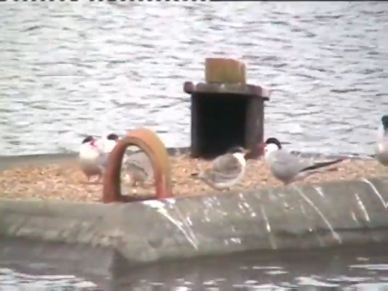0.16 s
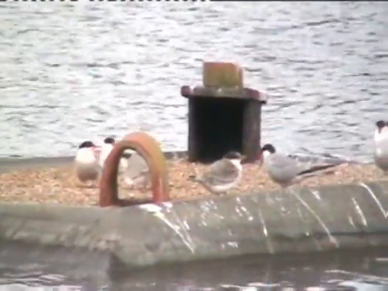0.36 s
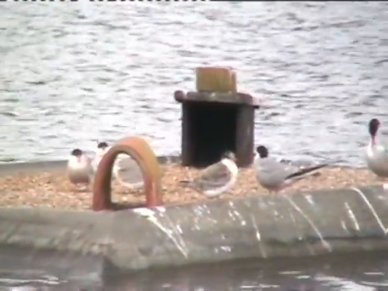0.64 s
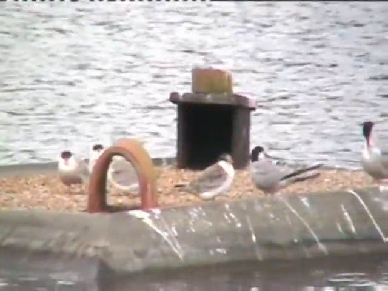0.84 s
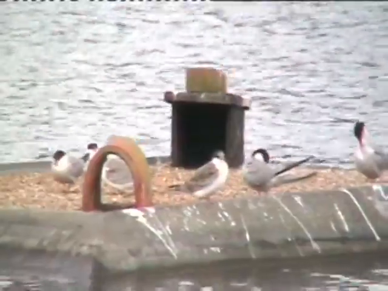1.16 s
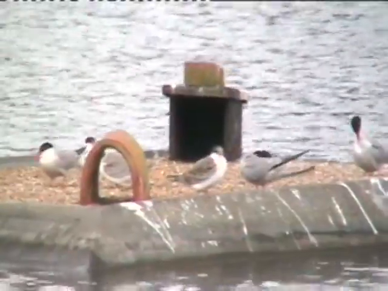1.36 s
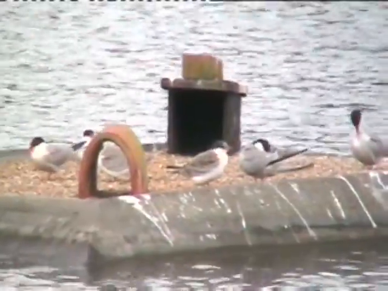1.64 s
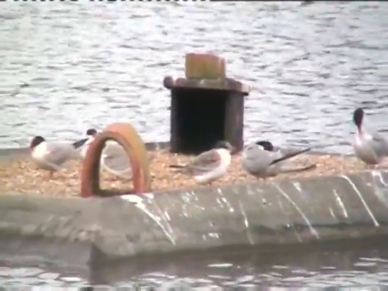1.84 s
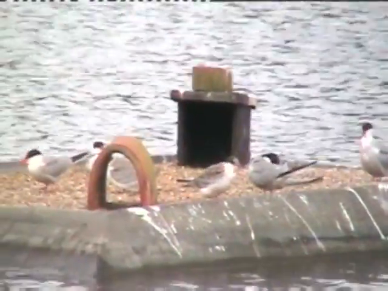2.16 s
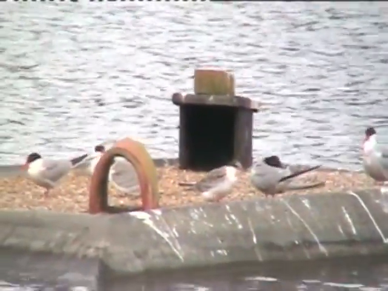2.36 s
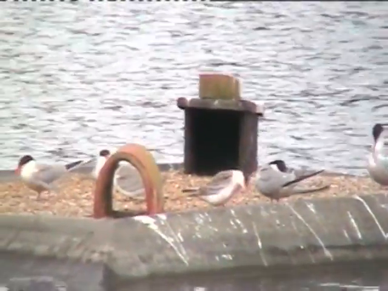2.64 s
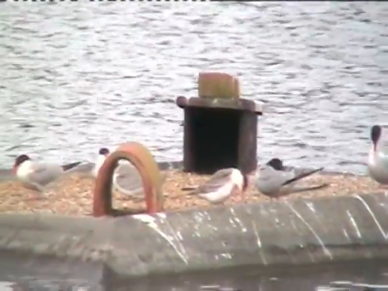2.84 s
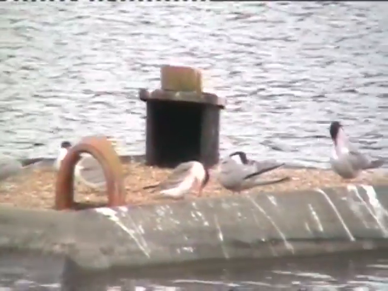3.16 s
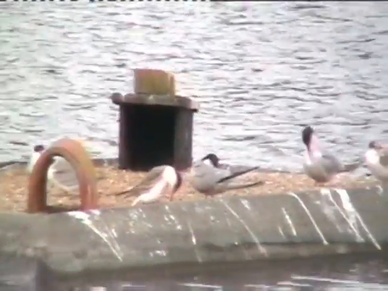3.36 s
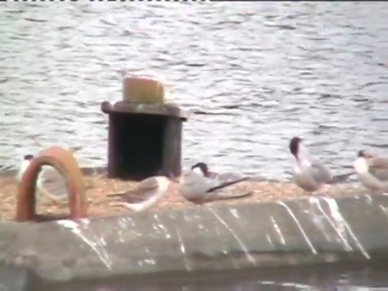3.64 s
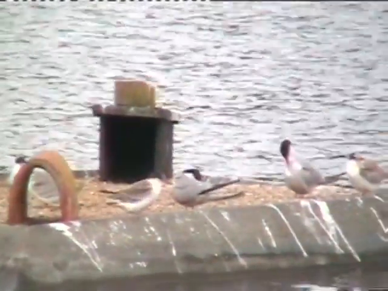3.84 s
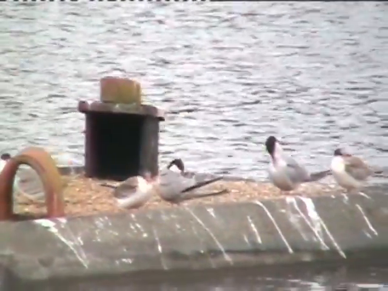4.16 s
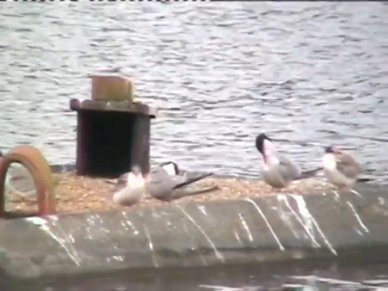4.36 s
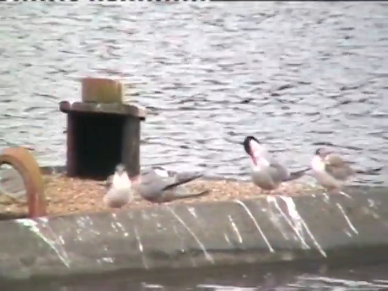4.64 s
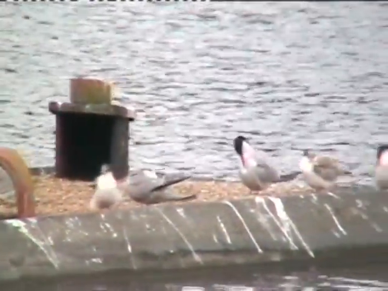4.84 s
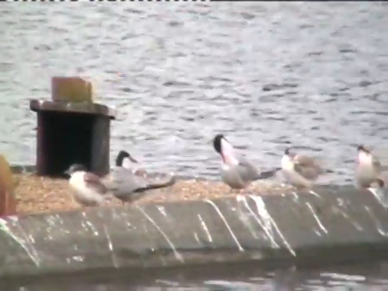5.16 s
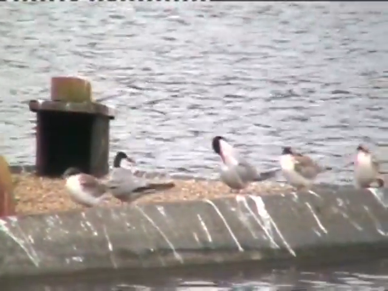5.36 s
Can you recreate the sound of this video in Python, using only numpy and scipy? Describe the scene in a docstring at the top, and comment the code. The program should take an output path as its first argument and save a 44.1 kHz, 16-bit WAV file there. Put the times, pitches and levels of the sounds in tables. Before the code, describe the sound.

Terns chatter in quick clipped notes, then give harsh pulsed calls and two trilled falling cries over a murmuring colony and steady wind hiss.

```python
"""A near tern chatters in clipped notes, each a harmonic stack that snaps on and breaks off in a puff of breath.
Around it on a gravel raft in a lake: two trilled falling cries, long pulsed calls, thin peeps, hoarse rasps.
The far colony murmurs as overlapping blurred notes; wind and water are shaped noise.
A camera with two close microphone ports adds the whine and buzz of its own drive: thin lines and locked harmonics."""
import sys
import numpy as np
from scipy import signal
from scipy.fft import rfft, irfft, next_fast_len
from scipy.io import wavfile
from scipy.ndimage import uniform_filter1d

SR = 44100
rng = np.random.default_rng(int(sys.argv[2]) if len(sys.argv) > 2 else 0)


def store_wav(level_fs):
    """Save 16-bit WAV to argv[1]."""
    pcm = np.round(np.clip(np.atleast_2d(level_fs), -1, 1) * 32767)
    wavfile.write(sys.argv[1], SR, pcm.T.astype(np.int16))


def elevation(decibels):
    """Turn decibel levels (scalar or array-like) into linear amplitude ratios."""
    levels = np.asarray(decibels, float)
    return 10 ** (levels / 20)


N = 242991

# microphone ports: (frequency [Hz], likeness of wind in both [0-1], left leads [rad], left minus right [dB])
PORTS = [(40, 0.3, 0.5, -4.5), (129, 0.8, 3, -2), (260, 0.4, 2.5, -1.5), (516, 0.44, 1.05, -2),
         (950, 0.61, 0, -0.5), (2000, 0.52, 0.08, -1.1), (4000, 0.7, -1.03, -2), (6360, 0.98, -1.76, -4),
         (7500, 0.8, -2, 0)]
TRILL_S, TRILL_LEAD_S = 0.0303, 0.0065  # spacing of the catches; how far their grid precedes the voice break


def evened(x):
    """Scales to rms 1."""
    return x / np.sqrt(np.mean(x ** 2) + 1e-20)


def read(points, hz, axis=1):
    """Reads one column of a table over log frequency."""
    table = np.transpose(points)
    return np.interp(np.log(hz + 1), np.log(table[0] + 1), table[axis])


def add(mix, s, sound):
    """Adds a sound at s seconds, cut at the end of the mix."""
    part = mix[round(s * SR):][:len(sound)]
    part += sound[:len(part)]


def band_noise(count, width_hz):
    """Complex noise that wanders at about width_hz, power 1."""
    r = np.exp(-np.pi * width_hz / SR)
    white = rng.standard_normal((count + 2000, 2)) @ [1, 1j]
    z = signal.lfilter([1], [1, -2 * r, r * r], white)[2000:]
    return z / np.sqrt(np.mean(abs(z) ** 2))


def syrinx(hz, harmonics_db, rough, smear_hz=130):
    """A harmonic stack; roughness trades each steady line for a fuzzy one, wider on higher harmonics."""
    phase = 2 * np.pi * np.cumsum(hz) / SR
    rough = np.clip(rough, 0, 1)
    out = 0
    for k, db in enumerate(harmonics_db, 1):
        fuzz = np.sqrt(1 - rough) + np.sqrt(rough) * band_noise(len(hz), k * smear_hz)
        out = out + elevation(db) * np.sqrt(2) * (np.exp(1j * k * phase) * fuzz).real
    return out


def port_pair(hz, likeness):
    """Left and right factors, scaled so that their mean nearly keeps the power of the source."""
    half = elevation(read(PORTS, hz, axis=3) / 2) * np.exp(0.5j * read(PORTS, hz, axis=2))
    mean_power = (abs(half) ** 2 + abs(half) ** -2 + 2 * likeness * np.cos(2 * np.angle(half))) / 4
    return np.array([half, 1 / half]) / np.sqrt(mean_power + 0.037)


def whine():
    """Thin lines that waver in strength and phase and beat with a slowly turning part of the drive."""
    # tones of the camera drive: (frequency [Hz], level [dB])
    hum_lines = [(207, -72), (1334, -71), (2223, -69), (3113, -69), (4447, -71)]
    whine_lines = [(4891, -70), (5215, -66.5), (5336, -62), (5356, -63.5), (5780, -70), (5803, -64),
                   (5986, -67.5), (6385, -70.5)]
    t, out = np.arange(N) / SR, np.zeros(N)
    for hz, db in hum_lines + whine_lines:
        coarse_t = t[::256]
        waver = np.interp(t, coarse_t, band_noise(len(coarse_t), 900).real)  # at about 900 / 256 Hz
        beat = 1 + 0.29 * np.cos(2 * np.pi * (8.5 * t + rng.random()))
        line = np.sin(2 * np.pi * (hz * t + rng.random()) + 0.72 * waver)
        out += elevation(db) * evened(elevation(0.92 * waver) * beat * line)
    return out


def buzz():
    """Motor ticks ringing in the camera body: harmonics locked in step, so the treble throbs at the tick rate."""
    tick_hz = 298.16
    # a second rotation repeats the harmonics shifted upward: (shift [Hz] of each set)
    shifts_hz = [0, 93.5, 102.5, 196, 204.3]
    # strength of the sets: (level [dB] of each set)
    sets_db = [-68.5, -71, -70, -68, -74.5]
    # ring of the camera body: (frequency [Hz], gain [dB])
    body = [(5000, -9), (5300, -0.5), (5600, 0), (5900, -1.5), (6200, -2), (6500, -12), (7100, -20)]
    t, k = np.arange(N) / SR + rng.random(), np.arange(15, 24)  # audible harmonics
    cycle = np.arange(4096) / 4096
    place = (tick_hz * t % 1 * len(cycle)).astype(int)
    out = np.zeros(N)
    for shift_hz, db in zip(shifts_hz, sets_db):
        lines = elevation(db + read(body, k * tick_hz + shift_hz))
        tick = lines @ np.exp(2j * np.pi * np.outer(k, cycle))
        turn = np.exp(2j * np.pi * shift_hz * t)
        out += np.sqrt(2) * (tick[place] * turn).real
    return out


def wind():
    """Smooth hiss of wind and water with faint patches, partly unrelated at the two ports."""
    # hiss spectrum: (frequency [Hz], relative density [dB per Hz])
    hiss_shape = [(40, -26), (130, -25.5), (190, -15.5), (300, -3.5), (630, 1), (1450, -6), (2640, -11.5),
                  (4380, -9.5), (4990, -12), (5450, -8), (6360, -13), (7000, -19.5), (7760, -39),
                  (9000, -71)]
    level_db, patch_db = -48.5, 0.8
    frames, hz = N // 256 + 5, np.fft.rfftfreq(1024, 1 / SR)
    a, b, c, d, patches = rng.standard_normal((frames, 513, 5)).T
    patches = evened(uniform_filter1d(uniform_filter1d(patches, 10, 0), 14, 1))
    same = np.clip(read(PORTS, hz), 0, 1)
    left = a + 1j * b
    right = same[:, None] * left + np.sqrt(1 - same[:, None] ** 2) * (c + 1j * d)
    z = np.array([left, right])
    z *= elevation(read(hiss_shape, hz)[:, None] + patch_db * patches) * port_pair(hz, same)[:, :, None]
    hiss = signal.istft(z, nperseg=1024, noverlap=768)[1][:, :N]
    return elevation(level_db) * hiss / hiss.mean(0).std()


def far_colony():
    """Many overlapping distant calls, blurred to hoarse notes that crowd in a few bands."""
    # swell of the whole colony: (time [s], level [dB])
    colony_db = [(0, -56), (.7, -55), (.8, -70.5), (.9, -54), (1.65, -55.5), (1.75, -64.5), (1.9, -53.5),
                 (2.38, -53.5), (2.44, -72.5), (2.67, -68), (2.72, -48), (3.02, -52.5), (3.09, -61),
                 (3.5, -49.5), (4.0, -59.5), (4.15, -54), (5.5, -50)]
    # where its calls crowd: (centre [Hz], half width [Hz], level [dB])
    bands = [(1800, 300, 1), (3284, 300, -5), (4320, 300, 2)]
    mix, u = np.zeros(N), np.linspace(0, 1, 6000)
    for when, band, spread, size in rng.random((600, 4)):
        hz, width_hz, db = bands[int(band * len(bands))]
        pitch_hz = hz + width_hz * (2 * spread - 1 + 0.297 * (0.5 - u))
        note = syrinx(pitch_hz, [db - 3 * size], 1.0, smear_hz=464)
        add(mix, when * N / SR, note * np.sin(np.pi * u))
    return evened(mix) * elevation(np.interp(np.arange(N) / SR, *np.transpose(colony_db)))


def rasp(s, length_s, hz, width_hz, db, pulses_per_s=120):
    """Noise in the throat resonance, gated by uneven pulses."""
    t = np.arange(0, length_s, 1 / SR)
    turns = np.cumsum(pulses_per_s * (1 + 0.25 * band_noise(len(t), 150).real)) / SR
    throat = (band_noise(len(t), width_hz) * np.exp(2j * np.pi * hz * t)).real
    gate = 0.27 + np.exp(-(turns % 1) / 0.3)
    return s, elevation(db) * evened(throat * gate) * signal.windows.tukey(len(t), 0.5)


def peep(s, length_s, start_hz, end_hz, db):
    """One thin line that glides fast, then levels out."""
    u = np.linspace(0, 1, int(length_s * SR))
    hz = end_hz + (start_hz - end_hz) * (1 - u) ** 2.2
    return s, syrinx(hz, [db], 0.06) * signal.windows.tukey(len(u), 0.4)


def long_call(voice, s, length_s, top_hz, end_hz, db):
    """A drawn-out stack that bends at its top, sags and changes level, chopped by a slightly uneven throb."""
    # voices: name: (pulse rate [1/s], pulse depth [0-1], roughness [0-1], climb [share of pitch],
    # place of the top [0-1], level change after the top [dB], harmonics [dB])
    voices = {"open": (44.5, 0.28, 0.25, 0.07, .33, -7, [-11, 0, -11.5, -4.5, -14.5]),
              "soft": (33, 0.4, 0.48, .02, .25, -1, [-10, 0]),
              "clear": (42, 0.33, 0.26, .025, .18, -5.5, [-14, 0, -10.5, -12]),
              "high": (45, .6, 0.36, -0.07, 0.77, -2, [0.5]),
              "hoarse": (87, 0.5, 0.65, .01, .55, -7.5, [-14, 1.5, -7, -12, -10.5]),
              "buzz": (73.3, 0.74, 0.55, .01, .33, -4.5, [-11, -9, -11, -1, -2.5, -10]),
              "stutter": (38.3, 0.9, 0.4, 0.011, .15, 1.5, [-12, -13.5, -9.5, -1.5, -13.5, -10.5]),
              "thin": (37, .05, 0.06, 0.24, .48, -3, [0]),
              "arch": (40, .1, .16, .08, .38, -3, [-14, 0, -11, -11.5])}
    pulses_per_s, depth, rough, climb, top, fade_db, harmonics_db = voices[voice]
    u = np.linspace(0, 1, int(length_s * SR))
    turns = np.cumsum(pulses_per_s * (1 + 0.06 * band_noise(len(u), 30).real)) / SR
    throb = evened(1 + np.clip(depth, 0, 1) * np.cos(2 * np.pi * turns))
    hz = np.interp(u, [0, top, 1], [top_hz * (1 - climb), top_hz, end_hz])
    if climb > 0:  # rounds over its top
        span_hz = np.where(u < top, top_hz * climb, abs(top_hz - end_hz) + 1)
        hz = top_hz - (top_hz - hz) ** 2 / span_hz
    stack = syrinx(hz, harmonics_db, rough, smear_hz=112)
    swell_db = (climb > 0) * -2.5 * np.clip(1 - u / top, 0, 1)  # only a climbing call swells
    level_db = db + swell_db + fade_db * np.clip((u - top) / (1 - top), 0, 1) ** 2
    return s, elevation(level_db) * throb * stack * signal.windows.tukey(len(u), 0.22)


def hoarse_end(break_s):
    """The cry dies in a rasp that the trill keeps chopping."""
    # hoarse end: (time after the break [s], length [s], centre [Hz], width [Hz], level before the chopping [dB])
    ending = (.04, .088, 3000, 1300, -48)
    s, sound = rasp(break_s + ending[0], *ending[1:], pulses_per_s=230)
    t = ending[0] + TRILL_LEAD_S + np.arange(len(sound)) / SR
    return s, sound * (1 - 0.5 * np.cos(2 * np.pi * t / TRILL_S))


def cry(break_s, lead_s, top_hz, db, drop, slide_s):
    """A cry that climbs, trills in evenly spaced catches, falls, and breaks to a lower note."""
    # fall of the cry: (time from the break [s], pitch [share of the top], level [dB])
    fall = [(-.08, 1, -1.3), (-.046, 0.96, 0), (-.018, .9, 2), (-.002, .89, -1), (.002, .755, -0.5),
            (0.037, .722, -5), (.05, .7, -12)]
    # strength of harmonics 1-4: (level [dB] of each)
    cry_harmonics_db = [-1.5, 2, -13, -26]
    start_share, start_db, swell_s, rise_s = 0.84, -5.5, 0.03, 0.03
    trill_fade_s, trill_least, catch_db = 0.075, 0.15, 9.5
    s, share, fall_db = np.transpose(fall)
    t = np.arange(-lead_s, s[-1], 1 / SR)
    hz = top_hz * np.interp(t, [-lead_s, rise_s - lead_s, *s], [start_share, 0.98, *share])
    level_db = db + np.interp(t, [-lead_s, swell_s - lead_s, *s], [start_db, 0, *fall_db])
    for k in (-6, -5, -4, -3, -2, -1, 1):  # the break stands in for catch 0
        catch_s = k * TRILL_S - TRILL_LEAD_S
        grow = np.clip((catch_s + lead_s) / trill_fade_s, 0, 1) ** 0.5
        shrink = np.clip(-catch_s / trill_fade_s, trill_least, 1)
        width_s = np.where(t < catch_s, slide_s, 0.004)
        hz = hz * (1 - drop * shrink * grow * np.exp(-abs((t - catch_s) / width_s) ** 3))
        level_db = level_db - catch_db * np.exp(-((t - catch_s - 0.002) / 0.003) ** 2)
    hz = hz * (1 + 0.008 * band_noise(len(t), 150).real)
    sound = elevation(level_db) * syrinx(hz, cry_harmonics_db, 0.039)
    return break_s - lead_s, sound * signal.windows.tukey(len(t), 0.04)


def chatter(mix):
    """Each note snaps on, slides in pitch and breaks off downward within 25 ms, in a puff of breath."""
    # clipped notes: (time [s], start pitch [Hz], pitch after 18 ms without scoop and break [Hz],
    # level [dB], low harmonics against the rest [dB])
    notes = [(0.004, 1113, 1049, -43.5, -7.5), (0.141, 1120, 1150, -49, -4), (0.166, 1244, 1196, -52, 3.5),
             (0.195, 1176, 1136, -45, -4.5), (0.221, 1077, 1078, -45.5, -10), (0.245, 1090, 990, -49.5, -5),
             (0.389, 1340, 1324, -45.5, -24), (0.425, 1184, 1347, -45, -9), (0.458, 1220, 1138, -44, -7.5),
             (0.485, 1143, 1132, -46.5, -5), (0.516, 1132, 1120, -46, -3), (0.607, 1316, 1392, -44, -13),
             (0.641, 1190, 1227, -45, -15), (0.675, 1094, 1217, -44.5, -26),
             (0.705, 1163, 1080, -46.5, -26), (0.85, 1330, 1540, -48, -24), (0.883, 1323, 1375, -45.5, -29),
             (0.927, 1470, 1402, -49, -20), (0.946, 1446, 1203, -47.5, -25.5),
             (0.978, 1345, 1350, -51, -27.5), (1.0, 1410, 1354, -52.5, -25), (1.018, 1357, 1396, -52, -25),
             (1.1, 1470, 1510, -49.5, -25), (1.167, 1392, 1360, -50, -19), (1.343, 1525, 1497, -51.5, -19),
             (1.366, 1465, 1426, -50, -21), (1.385, 1370, 1365, -50.5, -21),
             (1.402, 1394, 1316, -49.5, -25), (1.574, 1463, 1460, -52, -23), (1.602, 1434, 1326, -51, -12),
             (1.639, 1394, 1374, -51.5, -13)]
    # throat resonance: (frequency [Hz], gain [dB])
    throat_db = [(3300, -5), (3650, 1.5), (4100, -1), (4600, 0), (5000, -12)]
    t = np.arange(0, 0.03, 1 / SR)
    shape = np.clip(t / 0.0018, 0, 1) * np.clip((0.025 - t) / 0.009, 0, 1)
    for s, start_hz, end_hz, db, low_db in notes:
        slide_hz = start_hz + (end_hz - start_hz) * t / 0.018
        scoop = 0.2 * (end_hz > start_hz) * np.exp(-t / 0.003)  # a rising note starts low and leaps to pitch
        hz = slide_hz * (1 - 0.1 * (t / 0.0248) ** 4 - scoop)
        harmonics_db = [low_db - 4, low_db, read(throat_db, 3 * hz), read(throat_db, 4 * hz)]
        puff = syrinx(3900 + 0 * t, [-4], 0.9, smear_hz=1990)
        add(mix, s - 0.001, elevation(db) * shape * (syrinx(hz, harmonics_db, 0.16) + puff))


def scatter_off_raft(birds):
    """Adds a short decaying noise tail, the scatter off water and gravel."""
    t = np.arange(0, 0.25, 1 / SR)
    tail = rng.standard_normal(len(t)) * elevation(-60 * t / 0.44) * (t > 0.003)
    return birds + elevation(-10) * signal.oaconvolve(birds, tail / np.linalg.norm(tail))[:N]


def scene():
    """Birds with their scatter and the camera drive, through the ports, over the wind."""
    # trilled cries: (voice break [s], lead-in before it [s], top pitch [Hz], level [dB],
    # largest pitch drop in a catch [share], slide into it [s])
    cries = [(3.344, .181, 1823, -44.5, .15, .0075), (5.389, .209, 1757, -44, .1, .004)]
    # long pulsed calls: (voice, time [s], length [s], top pitch [Hz], end pitch [Hz], level [dB])
    long_calls = [("open", .02, .29, 1005, 925, -49.5), ("soft", .36, 0.41, 925, 847, -55),
                  ("clear", .965, .3, 1030, 930, -50.5), ("high", 1.055, 0.295, 4650, 4180, -56.5),
                  ("soft", 1.26, 0.28, 935, 865, -58), ("arch", 1.87, .24, 1008, 965, -52),
                  ("soft", 2.1, 0.19, 940, 845, -53), ("soft", 2.31, .11, 950, 930, -53),
                  ("clear", 2.92, .28, 1018, 960, -51), ("arch", 4.105, .235, 1025, 910, -49.5),
                  ("hoarse", 2.715, .2, 940, 910, -49), ("hoarse", 4.81, 0.11, 950, 900, -52.5),
                  ("buzz", 2.71, 0.18, 861, 807, -53), ("stutter", 2.873, .143, 795, 690, -49.5),
                  ("thin", .19, .095, 1430, 1100, -53.5), ("thin", .29, 0.15, 1450, 1190, -55.5),
                  ("stutter", 3.498, .065, 673, 674, -55.5), ("soft", 3.5, 0.078, 900, 880, -56)]
    # thin gliding peeps: (time [s], length [s], start pitch [Hz], end pitch [Hz], level [dB])
    peeps = [(0.16, .02, 1350, 2000, -52), (0.207, .02, 1500, 1940, -50.5), (0.23, 0.022, 1400, 1940, -49),
             (.263, .02, 1440, 1900, -51), (0.282, .045, 1550, 2230, -54), (.322, .026, 1840, 2230, -54),
             (.308, .024, 1300, 1800, -50), (.917, .012, 4300, 3500, -52), (0.995, 0.045, 4300, 3450, -58),
             (1.52, .045, 4550, 4000, -54), (2.272, 0.052, 4100, 3620, -55), (2.382, 0.02, 3760, 3450, -57)]
    # hoarse rasps: (time [s], length [s], centre [Hz], width [Hz], level [dB])
    rasps = [(1.092, .11, 4300, 595, -55), (1.329, .1, 4180, 940, -51), (1.55, 0.14, 4130, 802, -55),
             (1.958, 0.31, 1924, 617, -57), (1.409, .11, 3280, 451, -55), (4.167, 0.22, 4470, 500, -53),
             (4.62, .35, 4410, 371, -56.5), (4.814, 0.12, 3200, 704, -52.5), (2.915, .08, 4130, 402, -55.5),
             (4.8, .17, 1646, 605, -52.5), (4.84, 0.098, 4980, 1190, -51), (5.27, .12, 4160, 897, -50)]
    birds = far_colony()
    calls = [rasp(*row) for row in rasps] + [peep(*row) for row in peeps]
    calls += [long_call(*row) for row in long_calls]
    calls += [hoarse_end(row[0]) for row in cries] + [cry(*row) for row in cries]
    for s, sound in calls:
        add(birds, s, sound)
    chatter(birds)
    birds = scatter_off_raft(birds)
    # the bird sounds are cut steeply below about 700 Hz
    birds = signal.sosfilt(signal.butter(4, 700, "high", fs=SR, output="sos"), birds)
    size = next_fast_len(N)
    pair = port_pair(np.fft.rfftfreq(size, 1 / SR), 0.79)
    return irfft(rfft(birds + whine() + buzz(), size) * pair, size)[:, :N] + wind()


def band_limit(x):
    """A steep low-pass at the top of the band."""
    return signal.sosfilt(signal.butter(12, 7910, fs=SR, output="sos"), x)


def record(dry):
    """Adds the steady bias of the converter and finishes the mix."""
    mix = dry - 0.0017
    return band_limit(mix)


dry = scene()
out = record(dry)
store_wav(out)
```